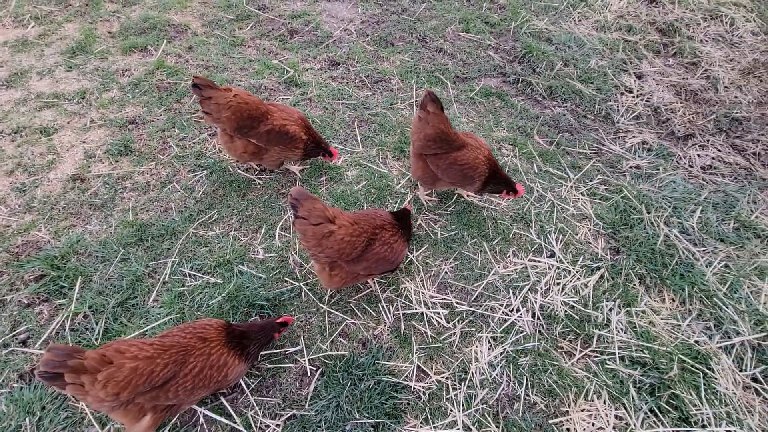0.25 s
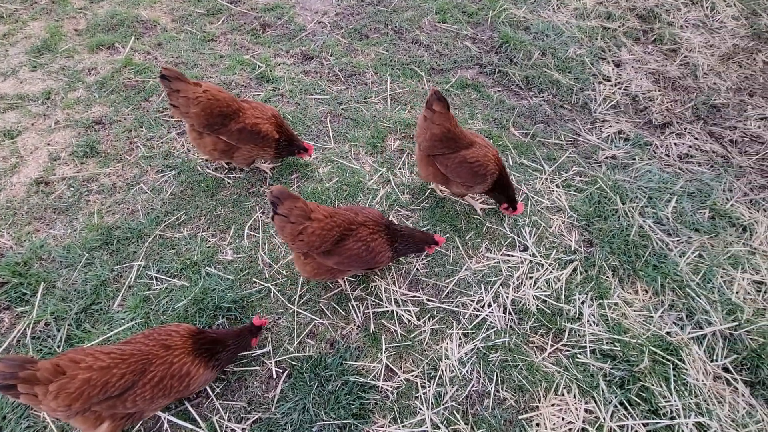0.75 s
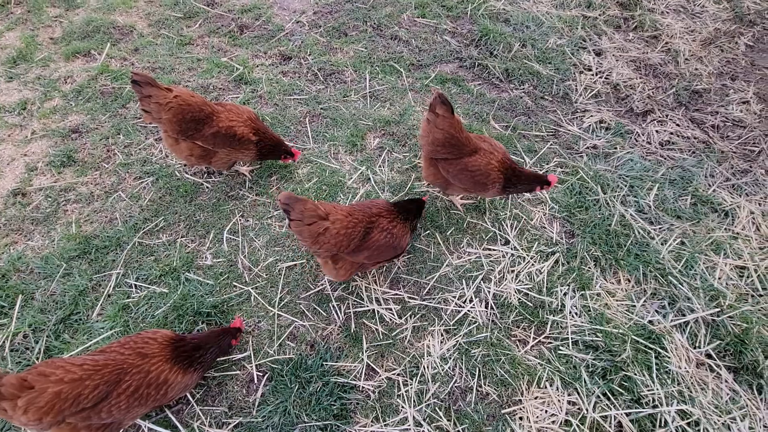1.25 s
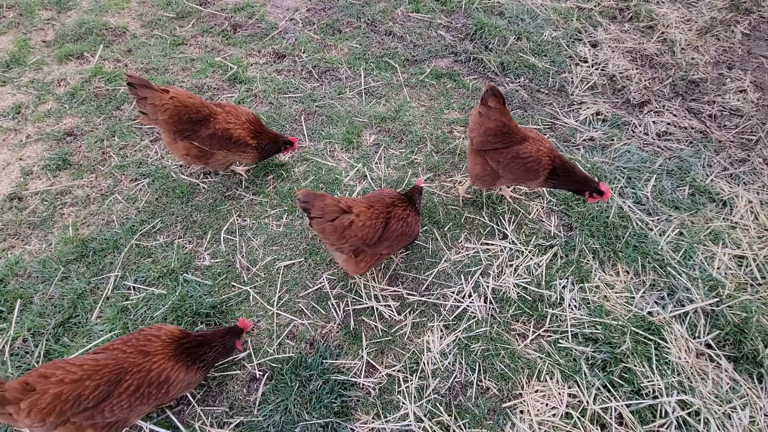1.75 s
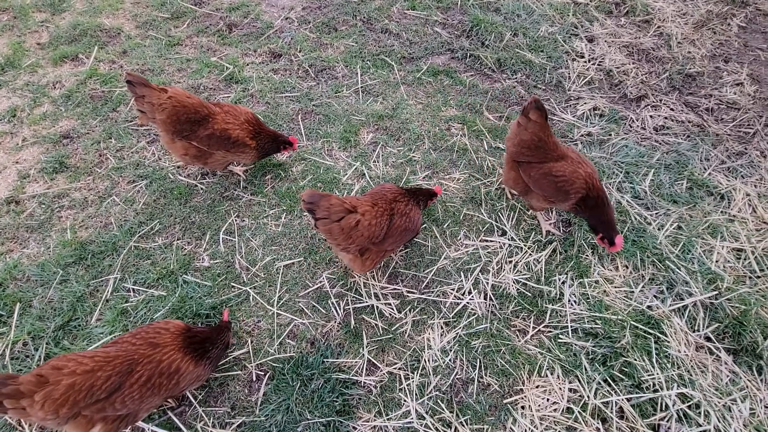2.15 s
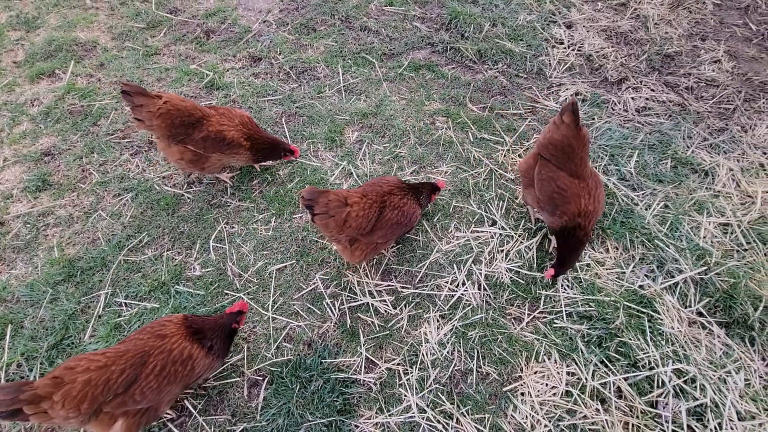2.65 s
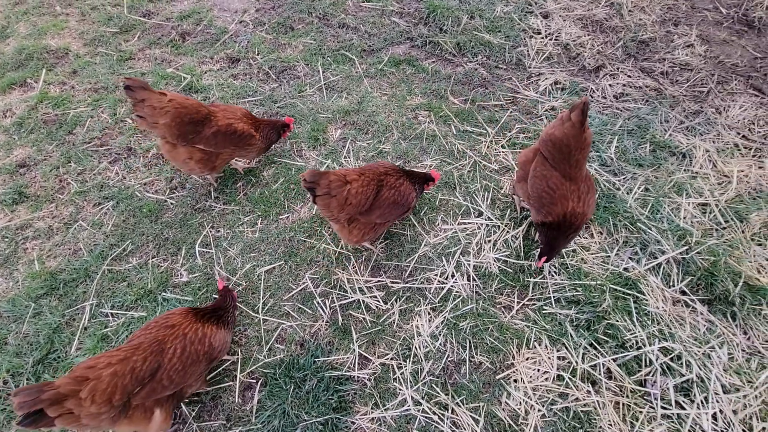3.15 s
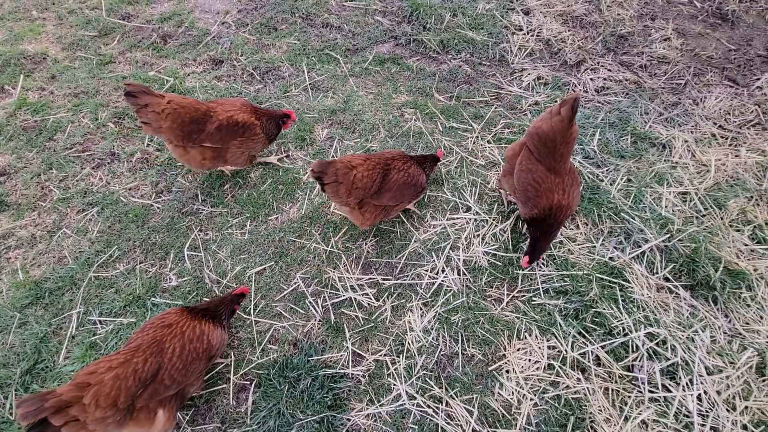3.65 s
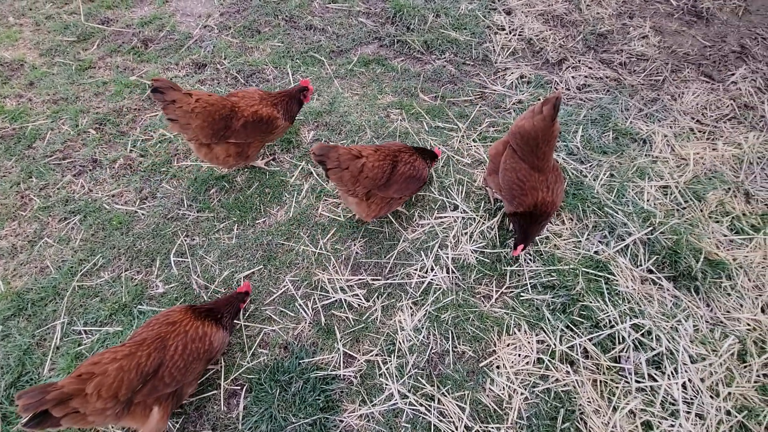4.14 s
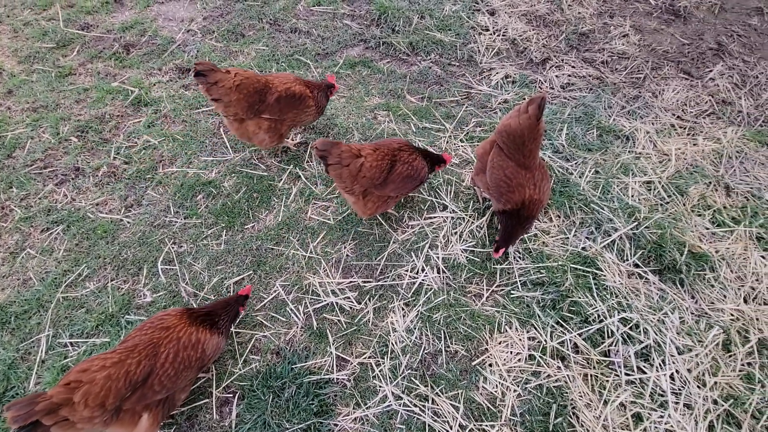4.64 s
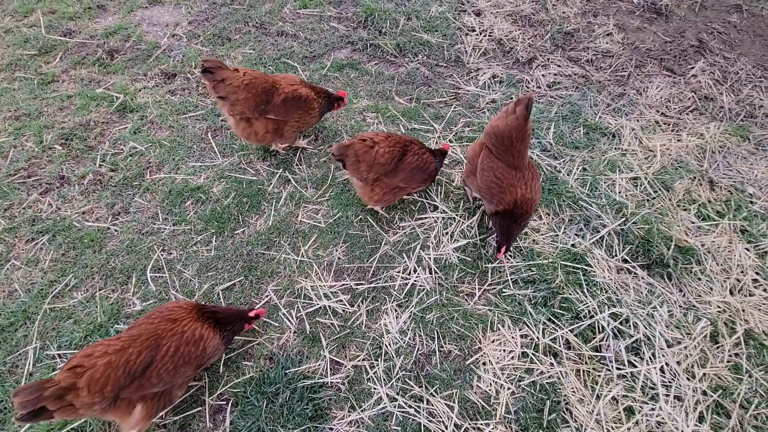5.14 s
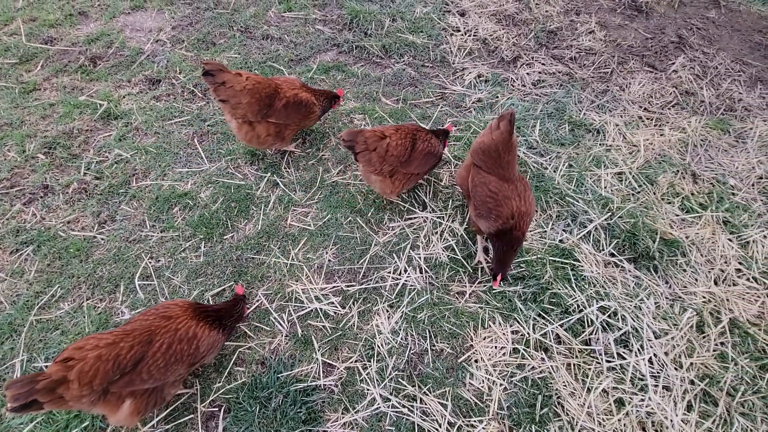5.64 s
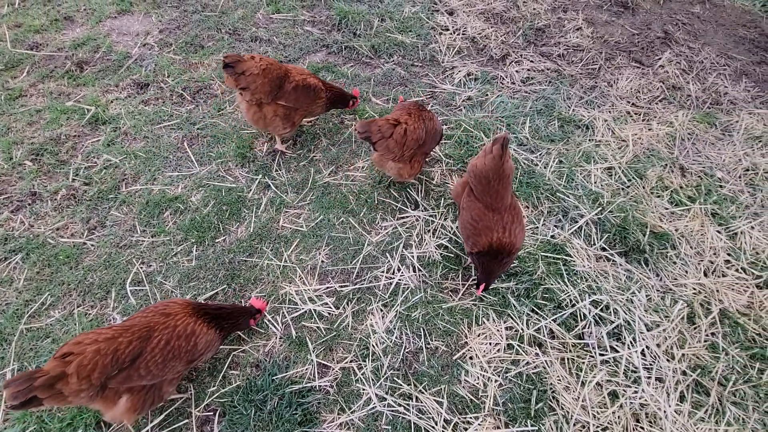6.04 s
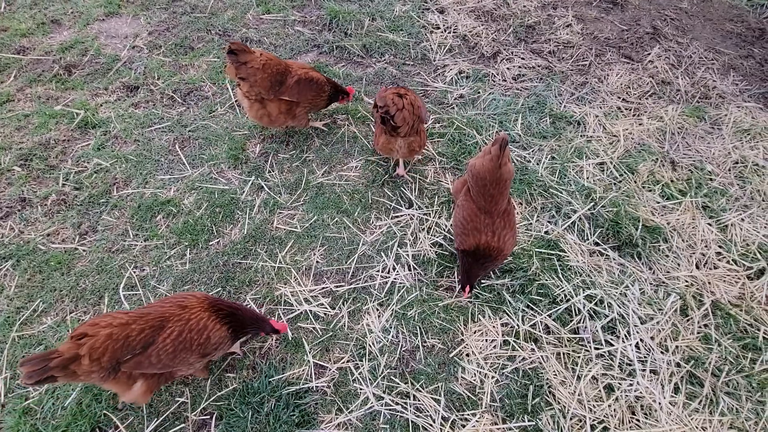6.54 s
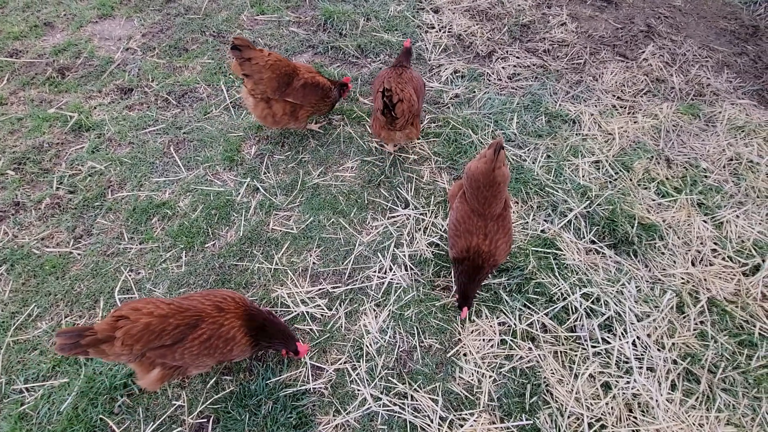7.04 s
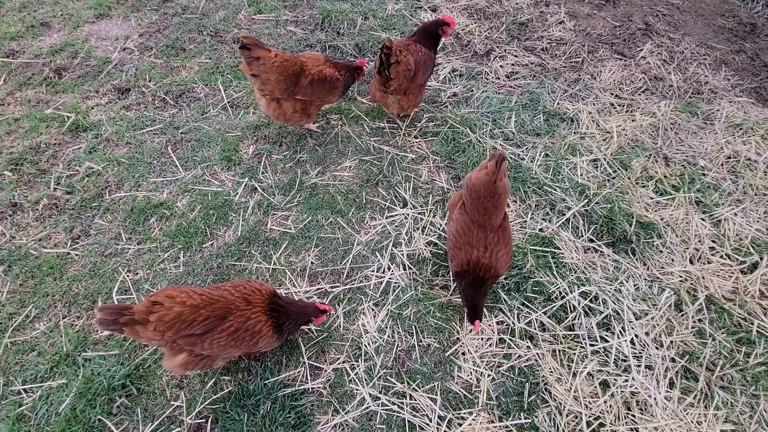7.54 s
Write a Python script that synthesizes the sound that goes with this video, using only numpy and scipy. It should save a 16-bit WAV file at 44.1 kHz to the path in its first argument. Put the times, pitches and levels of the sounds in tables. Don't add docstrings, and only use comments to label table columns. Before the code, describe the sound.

A quiet outdoor yard heard through a small close stereo microphone. From 0 to 1.2 seconds hens stir dry straw busily: crisp bright stalk snaps on both sides, light beak taps and short foot rustles, with tiny soft murmurs near 0.3 and 0.8. The activity thins, and at about 1.9 to 2.2 seconds come two short throaty clucks, the first dipping then rising, the second higher and pushed. Sharper pecks land around 2.4 and 2.7. Scattered snaps and flicks continue, with faint low murmurs near 3.6 and 4.3. Straw rustles again around 5.6 to 5.8, a cluster of crackles comes at 6.7 to 6.8, and a crisp peck and snap at 7.3. Breeze hiss in the grass fades after 3 seconds. A far idling engine hums steadily over low rumble, its drone swelling from 5 to 6.3 seconds, then easing until the end near 7.8.

```python
import sys
import numpy as np
from scipy import signal
from scipy.fft import rfft, irfft, next_fast_len
from scipy.io import wavfile
from scipy.ndimage import uniform_filter1d, map_coordinates

SR = 44100
rng = np.random.default_rng(int(sys.argv[2]) if len(sys.argv) > 2 else 0)


def wav_out(sig):
    wavfile.write(sys.argv[1], SR, np.round(np.clip(np.atleast_2d(sig).T, -1, 1) * 32767).astype(np.int16))


def voltage_ratio(decibels):
    exponent = np.asarray(decibels, float) / 20
    return 10 ** exponent


N = 343715
HISS_HZ, TOP_HZ = 15850, 16600


def unit(x):
    return x / np.sqrt(np.mean(x ** 2) + 1e-20)


def along(points, hz):
    f, v = np.transpose(points)
    return np.interp(np.log(hz + 1), np.log(f + 1), v)


def curves(rows, t):
    s, *cols = np.transpose(rows)
    return [np.interp(t, s, c) for c in cols]


def wobble(rate):
    knots = rng.standard_normal(int(N * rate / SR) + 4)
    return map_coordinates(knots, [np.arange(N) * rate / SR])


def filtered(x, response):
    m = next_fast_len(x.shape[-1] + 8192)
    return irfft(rfft(x, m) * response(np.fft.rfftfreq(m, 1 / SR)), m)[..., :x.shape[-1]]


def tinted(x, points):
    def response(hz):
        gain = voltage_ratio(along(points, hz))
        return gain / np.sqrt(np.mean(gain ** 2))
    return filtered(x, response)


def sides(balance_db, lead):
    ratio = voltage_ratio(balance_db) * np.exp(1j * lead)
    return np.array([2 * ratio, 2 + 0 * ratio]) / (1 + ratio)


def add(track, s, sound):
    part = track[:, round(s * SR):][:, :sound.shape[1]]
    part += sound[:, :part.shape[1]]


# f/Hz, width/Hz, level/dB
THROAT_RINGS = [(779, 85, 10), (1120, 105, 4.5), (1366, 87, -11.5), (1770, 240, -19), (3750, 150, -25.5),
                (4300, 400, -36)]
CLOSED_SHIFT, OPENING_S = 0.93, 0.016


def throat(f, shape):
    total = 0
    for k, (c, width, db) in enumerate(shape):
        push = (-1) ** k * voltage_ratio(db) * 1j * f * width * c * c
        total = total + push / (c * c - f * f + 1j * f * width) / (c * c + f * f)
    return total


def voice_box(f):
    closed = [(c * (CLOSED_SHIFT if k == 1 else 1), w, db) for k, (c, w, db) in enumerate(THROAT_RINGS)]
    steep = (f / 620) ** 2 / (1 + (f / 620) ** 4) ** .5
    return np.array([throat(f, closed), throat(f, THROAT_RINGS)]) * steep


def air_sac(f):
    return 1 / np.sqrt(1 + ((f - 300) / 60) ** 2)


# t/s, pulse rate f/Hz, effort level/dB
CLUCK_PATHS = [
    [(1.9205, 193.5, -47), (1.9245, 192, -37.5), (1.94, 175.8, -38.5), (1.955, 188, -39),
     (1.967, 225.4, -41), (1.983, 261, -43), (1.995, 271, -57), (2.006, 264, -66)],
    [(2.102, 248, -58), (2.105, 244, -44), (2.115, 247, -46), (2.12, 293, -42.5), (2.126, 293, -38.5),
     (2.135, 282, -36), (2.152, 285.5, -48), (2.161, 288, -68), (2.178, 285, -66)],
]
# f/Hz, level/dB
HEN_SIDE_LEVEL = [(150, -1), (300, -3.5), (600, -6), (1000, -4), (1500, -3), (2500, -16)]
# f/Hz, phase/rad
HEN_SIDE_PHASE = [(150, 0), (300, -.3), (500, -1.4), (800, -1.8), (1200, -2.4), (1800, -2.7)]
TIGHT_HZ, SLACK_PER_HZ = 270, 0.0033
ONSET_ROUGH, SETTLE_S = .45, .013
CHEST_DB, CHEST_LATE_DB, CHEST_RISE_S, CHEST_HOLDS = -5, 9, 0.047, 0.34


def clucks():
    pulses, chest, shut = np.zeros((3, N))
    for rows in CLUCK_PATHS:
        at = np.arange(round(rows[0][0] * SR), round(rows[-1][0] * SR))
        hz, effort_db = curves(rows, at / SR)
        age = (at - at[0]) / SR
        slack = SLACK_PER_HZ * np.clip(TIGHT_HZ - hz, 0, None)
        rough = np.maximum(slack, ONSET_ROUGH * np.exp(-(age / SETTLE_S) ** 2)) + .03
        shut[at - 40] = np.exp(-age / OPENING_S)
        cycles = np.cumsum(hz) / SR + .2
        beats = np.flatnonzero(np.diff(np.floor(cycles)))
        chance = rng.standard_normal((40, 2))[:len(beats)] * rough[beats, None]
        late = (chance[:, 0] * 55).astype(int)
        pulses[at[beats] + late] = -voltage_ratio(effort_db[beats] + 36 + 3 * chance[:, 1])
        breath = rough * rng.standard_normal(len(at)) * np.exp(-3 * (cycles % 1))
        pulses[at] += voltage_ratio(effort_db + 22) * breath
        chest_db = CHEST_DB - CHEST_LATE_DB * np.exp(-age / CHEST_RISE_S)
        chest_db = chest_db + CHEST_HOLDS * (effort_db.max() - effort_db)
        low = air_sac(hz) * np.sin(2 * np.pi * cycles + 5.9)
        low = low + 0.5 * air_sac(2 * hz) * np.sin(4 * np.pi * cycles + 0.65)
        chest[at] = voltage_ratio(effort_db + chest_db + 5.0) * low
    voice = -filtered(pulses * [shut, 1 - shut], voice_box).sum(0) - chest
    voice = voice + voltage_ratio(-15) * np.roll(voice, 420) + voltage_ratio(-22) * np.roll(voice, 900)
    return filtered(voice, lambda hz: sides(along(HEN_SIDE_LEVEL, hz), along(HEN_SIDE_PHASE, hz)))


# t/s, peak level/dB, f/Hz, length/s
MURMUR_NOTES = [
    (0.321, -56, 378, 0.01),
    (0.779, -56.5, 365, 0.029),
    (3.55, -59, 275, 0.016),
    (3.585, -56.5, 292, 0.017),
    (4.314, -50, 338, 0.008),
]


def murmurs():
    out = np.zeros((2, N))
    for s, db, hz, length in MURMUR_NOTES:
        u = np.arange(round(2 * length * SR)) / SR / length
        note = u * np.exp(1 - 3 * u) * 3 * np.exp(2j * np.pi * hz * length * u)
        add(out, s, voltage_ratio(db) * (sides(-1, -0.38)[:, None] * note).imag)
    return out


# t/s, peak level/dB, soil f/Hz
PECKS_ON_SOIL = [(0.805, -62, 1450), (0.869, -58, 736), (1.094, -59, 654), (1.534, -59, 1220),
                 (4.03, -59.5, 1200), (4.836, -66, 1460), (5.092, -58, 1310), (5.104, -66, 1910),
                 (5.391, -67, 1510), (5.73, -70, 1350), (5.775, -62, 620), (6.155, -70, 796),
                 (6.778, -67, 1320), (6.401, -66, 1270), (6.503, -68, 660), (7.288, -58.5, 1270),
                 (7.595, -66, 1440), (7.618, -67, 1240)]
# t/s, peak level/dB, soil f/Hz, stalk f/Hz
PECKS_ON_STALKS = [(0.227, -66, 1210, 1690), (0.295, -62, 770, 3660), (0.31, -59, 1120, 3630),
                   (0.566, -60, 856, 2970), (0.607, -64.5, 1100, 3060), (0.756, -69, 673, 2200),
                   (0.7803, -61, 1460, 2070), (1.072, -62, 690, 1140), (1.329, -62, 1230, 1870),
                   (1.346, -62, 1300, 1770), (1.657, -66, 1420, 1620), (2.378, -51.5, 1170, 2870),
                   (2.716, -54.5, 1290, 1810), (3.012, -66, 1120, 2100), (3.095, -66, 710, 4700),
                   (3.6117, -57.5, 750, 3520), (3.688, -71, 1260, 3750), (4.021, -69, 1270, 2020),
                   (4.156, -71, 1120, 3580), (4.215, -68, 1410, 3970), (4.313, -66.5, 915, 2920),
                   (4.497, -64.5, 1420, 2100), (5.504, -70, 695, 4700), (6.288, -66, 1010, 3220),
                   (6.744, -64, 1620, 1720), (7.162, -70, 1290, 1960), (7.275, -51.5, 1290, 5960),
                   (7.336, -65, 805, 1580)]
STALK_DB, LITTER_DB, LITTER_HZ = 4, -9.5, 2100


def pecks():
    out, t = np.zeros((2, N)), np.arange(600) / SR

    def ring(hz):
        fade = voltage_ratio(-60 * t / (.006 + 6 / hz))
        return fade * np.exp(2j * np.pi * hz * t) * (1 - np.exp(-(t / .0007) ** 2))

    knocks = [(*row, STALK_DB) for row in PECKS_ON_STALKS]
    for s, db, hz in PECKS_ON_SOIL:
        knocks.append((s, db, hz, LITTER_HZ * np.exp(0.071 * rng.standard_normal()), LITTER_DB))
    for s, db, soil_hz, stalk_hz, stalk_db in knocks:
        place = sides(rng.normal(-1.4, 0.91), rng.choice([-1, 1]) * 1.4)[:, None]
        rings = (place * (ring(soil_hz) + voltage_ratio(stalk_db) * ring(stalk_hz))).imag
        grit = uniform_filter1d(rng.standard_normal((2, len(t))), size=4)
        tick = 0.29 * t / 0.00074 * voltage_ratio(-60 * t / 0.011) * grit
        add(out, s, voltage_ratio(db + 13.0) * (rings + voltage_ratio(stalk_db) * tick))
    return out


# t/s, thin crack level/dB, broad crack level/dB
CRACKS_RIGHT = [(0.1469, -42, -67), (0.1498, -48, -71), (0.2275, -41, -61), (0.3224, -35, -56),
                (0.3321, -43, -38), (0.4506, -41.5, -61), (0.4557, -42.0, -66), (0.5723, -32.5, -45),
                (0.5778, -36, -70.0), (0.8012, -51, -66), (0.8093, -47, -56), (0.856, -49, -63),
                (0.9221, -41, -63.0), (0.9474, -44, -65), (0.9824, -47, -74), (1.0079, -44, -65),
                (1.0248, -40.5, -65), (1.0429, -49, -67.0), (1.1005, -55, -67), (1.1067, -34.5, -64),
                (1.1587, -41, -61), (1.3318, -52, -44), (1.3396, -58, -47), (1.51, -50, -64),
                (1.9478, -53, -64), (2.0096, -44, -55), (2.0172, -46, -50), (2.0473, -43, -54),
                (2.0659, -45.0, -46), (2.4385, -62, -58), (2.7165, -56, -49), (2.7634, -44.0, -63),
                (3.0081, -52, -52), (3.0138, -39, -41), (3.0311, -54, -45.5), (3.437, -57, -69.0),
                (3.7954, -52, -50.5), (3.9185, -48.5, -56), (4.1597, -46, -41), (4.1923, -49, -63),
                (4.218, -47, -47), (4.3142, -65, -61), (4.8372, -52, -52.5), (4.938, -47, -58),
                (5.2937, -59, -77), (5.6067, -53, -56), (5.688, -52, -56), (5.8051, -36.5, -46),
                (6.1834, -36, -62), (6.3983, -48, -65.0), (6.9143, -54.0, -70.0), (6.9592, -66, -53.5),
                (7.1917, -46, -69.0), (7.2331, -48, -65), (7.2392, -47, -64.0), (7.5949, -42, -47)]
CRACKS_LEFTISH = [(0.0243, -38.5, -65), (0.2636, -50, -44.0), (0.2955, -46, -36.5), (0.3075, -38.0, -32),
                  (0.3486, -53.0, -54), (0.4056, -47, -49), (0.4898, -48, -55), (0.7498, -44, -43.5),
                  (0.8427, -45.0, -59.0), (0.8473, -43, -51), (0.8513, -54, -61), (1.095, -40.0, -62),
                  (1.3552, -39, -56), (1.3762, -39, -57.0), (1.381, -41, -59), (1.4258, -35.5, -51),
                  (1.4654, -47, -68.0), (1.658, -48, -51), (1.8584, -38, -44), (1.9322, -55, -53),
                  (2.4193, -42, -53), (2.803, -56, -57), (3.011, -42, -50), (3.1044, -36, -42),
                  (3.5632, -57.0, -50.5), (3.6124, -61, -43), (3.6875, -37.5, -45.5), (4.0305, -36.5, -41),
                  (4.348, -45, -67), (4.3574, -41, -45), (4.4983, -50, -45.5), (4.6094, -39.5, -72),
                  (5.0052, -51, -74.0), (5.0658, -53, -56), (5.0917, -41, -44.5), (5.1355, -57, -61.0),
                  (5.2289, -42.5, -55), (5.2397, -50, -65), (5.5329, -45, -64), (5.8118, -51, -56),
                  (5.9132, -47, -53), (6.1761, -46, -54), (6.289, -54.0, -67), (6.4022, -46.5, -44.5),
                  (6.4834, -54, -70), (6.5026, -52, -47), (6.7034, -42, -52), (6.7786, -52, -44),
                  (6.8132, -44.0, -47), (6.8323, -35, -43), (7.1637, -36, -51), (7.2729, -42, -47),
                  (7.2758, -30.5, -40), (7.337, -47, -43), (7.5453, -48, -50), (7.7384, -61, -64)]
CRACKS_MIDDLE = [(0.312, -36, -40), (0.5623, -34, -49), (0.566, -40, -45), (0.6071, -32, -50),
                 (0.6113, -29.5, -38), (0.7565, -45, -40), (1.2936, -55.0, -49), (1.3685, -41.0, -56),
                 (1.7765, -49, -52), (1.78, -53, -56), (1.7875, -46, -59), (1.7945, -45, -45),
                 (1.7993, -56, -56), (1.8095, -50, -45), (1.8622, -44.0, -45), (2.1251, -50, -50),
                 (2.3659, -37.5, -64), (2.378, -45, -51), (2.753, -36, -43.5), (3.097, -38, -58),
                 (3.3361, -54, -58), (3.3915, -51, -46), (3.4218, -42, -40.5), (3.4283, -37.0, -45),
                 (3.4333, -48, -51.0), (4.0232, -35.5, -49), (4.3336, -45, -72), (4.368, -37, -43.5),
                 (4.5886, -45, -66), (4.5946, -42, -63), (4.5988, -46.0, -64), (4.8748, -41, -60),
                 (4.9498, -52.0, -60), (5.0485, -49.0, -63), (5.0558, -57, -44.5), (5.0731, -38.5, -59),
                 (5.1935, -51, -68.0), (5.5049, -47, -53), (5.6817, -45.0, -47), (5.7041, -41, -57.0),
                 (5.7224, -44, -52), (6.1861, -52, -65), (6.2072, -48, -52), (6.226, -49, -49.5),
                 (6.2786, -53, -57.0), (6.2828, -51, -53), (6.6522, -39, -49), (6.6581, -41, -51),
                 (6.7346, -35, -41), (6.7377, -38, -42.5), (6.7858, -47, -48), (6.8197, -47, -41),
                 (6.8372, -49, -54), (7.1605, -39.5, -57), (7.1701, -54.0, -43), (7.1765, -51.0, -55.0)]
CRACKS_FURTHER = [(0.3688, -48, -66), (0.9176, -51, -60), (1.5748, -49, -63), (1.8362, -45, -62),
                  (2.1333, -55, -44), (3.3264, -51, -50.5), (5.6744, -51, -50), (5.9944, -49, -52),
                  (6.7163, -49, -53), (6.7445, -44, -46), (7.2893, -50, -53)]
# f/Hz, level/dB per Hz
THIN_STRAW = [(5000, -19), (8000, -10.5), (10500, -6.5), (12300, 6), (14000, 4.5), (16000, -3)]
# f/Hz, level/dB per Hz
THICK_CRACK = [(900, -12), (1600, -8), (3000, -7), (4500, -3.5), (6500, -7.5), (8500, -1), (10000, -10.5),
               (13000, -23)]
RIGHT_DB, LEFTISH_DB, MIDDLE_DB = -4.5, 2, 1
CRACK_S, SKIRT_S, SKIRT_DB = 0.00054, 0.027, -13
SHARED = 0.75


def snaps():
    fine, coarse, t = np.zeros((2, N)), np.zeros((2, N)), np.arange(-300, 500) / SR
    burst = np.exp(-(t / CRACK_S) ** 2) + voltage_ratio(SKIRT_DB - 60 * abs(t) / SKIRT_S)
    places = ((CRACKS_RIGHT, RIGHT_DB), (CRACKS_LEFTISH, LEFTISH_DB), (CRACKS_MIDDLE, MIDDLE_DB),
              (CRACKS_FURTHER, LEFTISH_DB))
    for rows, lr_db in places:
        pan = voltage_ratio([[lr_db / 2], [-lr_db / 2]])
        for s, thin_db, broad_db in rows:
            noise = rng.standard_normal((2, 3, len(t)))
            noise = noise[:, :2] + SHARED * noise[:, 2:] * [[[1], [1]], [[1], [-1]]]
            noise = noise * burst
            noise = noise / np.linalg.norm(noise, axis=2, keepdims=True) * np.linalg.norm(burst) * pan
            add(fine, s + t[0], voltage_ratio(thin_db - 4.0) * noise[0])
            add(coarse, s + t[0], voltage_ratio(broad_db - 7.0) * noise[1])
    return tinted(fine, THIN_STRAW) + tinted(coarse, THICK_CRACK)


# t/s, peak level/dB, f/Hz
TWIG_TICKS = [(0.024, -63, 1100), (0.264, -47, 4000), (0.799, -59, 1700), (1.1067, -39, 6700),
              (2.066, -55, 7740), (3.532, -66.5, 1290), (3.6128, -58, 1210), (3.796, -69, 1900),
              (3.919, -63, 3800), (5.606, -54, 7600), (5.68, -45, 8000), (6.279, -60, 3300),
              (6.298, -63, 3400), (6.503, -55, 3570), (6.762, -61, 3200), (6.833, -52, 3600),
              (6.833, -64, 2000), (7.275, -58, 2900), (7.545, -63, 3900)]
TWIG_CYCLES = 12


def twigs():
    out, t = np.zeros((2, N)), np.arange(400) / SR
    for s, db, hz in TWIG_TICKS:
        fade = voltage_ratio(db + 12 - 60 * t * hz / TWIG_CYCLES)
        ring = fade * np.exp(2j * np.pi * hz * t) * (1 - np.exp(-t / 0.00034))
        place = sides(rng.normal(-1, 2), rng.normal(0, 1))[:, None]
        add(out, s - .0005, (place * ring).imag)
    return out


# t/s, level/dB
STEADY_SHUFFLE = [(0, -62), (.45, -57.5), (1.0, -64), (1.25, -68), (2.3, -66), (3.3, -67), (4, -68),
                  (5.3, -71), (6.1, -68), (6.95, -72.5), (7.4, -68.5), (7.79, -69.5)]
# t/s, length/s, level/dB, coarse straw level/dB
FOOT_DRAGS = [(0.224, 0.12, -50, -12.5), (0.524, 0.11, -56, -29), (0.737, 0.024, -54, -15),
              (0.795, 0.099, -57, -19), (1.341, 0.029, -60, -3), (1.78, 0.039, -67, -11),
              (1.842, 0.036, -51.5, -17), (2.054, 0.011, -54.5, -9), (2.718, 0.077, -60, -7.5),
              (2.907, .17, -64, -14), (3.672, 0.089, -61, -11), (4.132, 0.082, -64.5, -6.5),
              (4.45, 0.12, -69.5, -7), (4.807, 0.11, -66.5, -8.5), (5.055, 0.079, -57.5, -14),
              (5.503, 0.036, -61.5, -7.5), (5.618, 0.078, -51, -12), (5.75, 0.077, -56, -10),
              (5.984, 0.057, -62.5, -13), (6.138, 0.074, -67, -8), (6.658, 0.015, -53.5, -20),
              (6.71, 0.055, -60, -8), (6.772, 0.063, -57, -13), (7.129, 0.06, -62, -9.5),
              (7.224, 0.073, -59, -15), (7.526, 0.18, -58, -13.5)]
# t/s, level/dB
BEAK_FLICKS = [(1.1, -56.5), (1.295, -56.5), (1.58, -59), (1.94, -61), (2.131, -55.5), (2.37, -58),
               (2.516, -60), (3.02, -60), (3.099, -50.5), (3.2, -59.5), (3.51, -61), (3.61, -57),
               (4.031, -55), (4.601, -62), (4.891, -60), (5.229, -60), (5.909, -56), (6.401, -59.5),
               (6.5, -58.5)]
BRUSH_S, RISE_DB_PER_S, FALL_DB_PER_S = 0.0019, 683, 493
BRUSH_COARSE_DB, SHUFFLE_COARSE_DB = -10, -10.5


def stirring():
    t = np.arange(0, N, 32) / SR
    flicks = [(s - BRUSH_S / 2, BRUSH_S, db, BRUSH_COARSE_DB) for s, db in BEAK_FLICKS]
    s, length, db, coarse_db = np.transpose(list(FOOT_DRAGS) + flicks)[..., None]
    before, after = np.maximum(s - t, 0), np.maximum(t - s - length, 0)
    moves = voltage_ratio(db - RISE_DB_PER_S * before - FALL_DB_PER_S * after)
    still = voltage_ratio(curves(STEADY_SHUFFLE, t)[0])
    fine = np.sqrt(still ** 2 + np.sum(moves ** 2, axis=0))
    coarse_moves = np.sum((moves * voltage_ratio(coarse_db)) ** 2, axis=0)
    coarse = np.sqrt((still * voltage_ratio(SHUFFLE_COARSE_DB)) ** 2 + coarse_moves)
    return [np.interp(np.arange(N) / SR, t, level) for level in (fine, coarse)]


def patchy(patchy_db):
    z = signal.stft(rng.standard_normal((2, 3, N)), nperseg=256)[2]
    field = uniform_filter1d(rng.standard_normal(z.shape[2:]), size=9, axis=0)
    field = uniform_filter1d(field, size=10, axis=1)
    noise = signal.istft(z * voltage_ratio(patchy_db * unit(field)), nperseg=256)[1][..., :N]
    return unit(noise[:, :2] + .5 * noise[:, 2:] * [[[0], [0]], [[1], [-1]]])


def clumps():
    happens = rng.random(N) < 350 * voltage_ratio(3 * wobble(30)) / SR
    cracks = happens * voltage_ratio(0.76 * rng.exponential(size=N) - 3.5)
    rough = voltage_ratio(1.3 * wobble(70)) * (.58 + np.convolve(cracks, np.hanning(60), "same"))
    return rough / np.sqrt(abs(uniform_filter1d(rough ** 2, size=3500)))


# f/Hz, level/dB per Hz
THICK_STRAW = [(700, -21), (1500, 0.5), (2500, -7), (3800, 0), (5500, -6.5), (8000, -1), (10000, -2.5),
               (13000, -38)]


def rustle():
    fine_gain, coarse_gain = stirring()
    fine, coarse = patchy(patchy_db=2.1)
    shared = clumps()
    thin = fine_gain * shared * fine
    thick = voltage_ratio(2.0) * coarse_gain * shared ** 0.43 * clumps() ** 0.83 * coarse
    return tinted(thin, THIN_STRAW) + tinted(thick, THICK_STRAW)


# t/s, level/dB
BREEZE_LEVEL = [
    (0.0, -66.5),
    (0.48, -64),
    (2.91, -75.5),
    (5.8, -79),
    (6.51, -83.5),
    (7.79, -80),
]
# f/Hz, level/dB per Hz
GRASS_HISS = [(400, 1.5), (800, 0.5), (2000, 0.5), (3000, -10), (6000, -25.5), (10000, -19), (13000, -2),
              (16000, 3.5)]


def breeze():
    level_db, = curves(BREEZE_LEVEL, np.arange(N) / SR)
    gusts_db = .8 * wobble(3.3) + 1.3 * wobble(30)
    return voltage_ratio(level_db + 5.5 + gusts_db) * tinted(rng.standard_normal((2, N)), GRASS_HISS)


# t/s, firing tone level/dB, exhaust overtones level/dB
ENGINE_SWELL = [(0.0, -51, -86), (0.28, -51, -74), (0.93, -55.5, -73.5), (2.0, -55, -71.5),
                (2.43, -55.5, -81), (3.2, -54.5, -80), (3.5, -51, -84), (3.9, -53.5, -81), (4.25, -51, -69),
                (4.79, -49.5, -68), (5.32, -47, -58.5), (5.7, -44.5, -60.5), (6.2, -46, -57),
                (6.55, -48.5, -67.5), (6.94, -47, -76.5), (7.05, -47, -67.5), (7.79, -49, -66)]
# shaft order, level/dB, left over right level/dB, left lead phase/rad
EXHAUST_TONES = [(12, -25, -4, -.5), (14, -24, -5, -1.5), (15, -23, -6, -2), (16, 0, -10, -2.2),
                 (17, -22, -9, -2.1), (18, -18, -5, -2.6), (20, -22, -8, -2.8), (22, -25, -8, -2.6),
                 (24, -17, -8, -2.4), (28, -23, -5, -2.8)]
SHAFT_HZ, PUFF_DB = 24.24, -17


def engine():
    firing_db, exhaust_db = curves(ENGINE_SWELL, np.arange(N) / SR)
    turn = 2 * np.pi * SHAFT_HZ * np.arange(N) / SR + .04 * wobble(1.5)
    tone = voltage_ratio(firing_db + .6 * wobble(6)) * sides(-1.1, .05)[:, None] * np.exp(4j * turn)
    for order, db, lr_db, lead in EXHAUST_TONES:
        flutter_db = (.8 if db == 0 else 2.6) * wobble(3)
        swell_db = exhaust_db if order < 17.5 else .38 * exhaust_db - 39
        wave = np.exp(1j * (order * turn + .2 * wobble(5)))
        tone = tone + voltage_ratio(db + flutter_db + swell_db) * sides(lr_db, lead)[:, None] * wave
    puff = (wobble(90) + 1j * wobble(90)) * np.exp(16j * turn)
    tone = tone + voltage_ratio(exhaust_db + PUFF_DB) * sides(-7.0, -3.5)[:, None] * puff
    return np.sqrt(2) * tone.real


# f/Hz, level/dB per Hz
FAR_RUMBLE = [(17, -24.5), (50, -1.5), (75, 0.5), (125, -10.5), (220, -21), (600, -28.5), (950, -40),
              (16000, -55)]
# f/Hz, side over mid level/dB
RUMBLE_WIDTH = [(30, -1.5), (60, -7), (110, -12.5), (200, -8.5), (380, 0.5), (700, 3.5), (3000, 4),
                (15000, -23)]


def distance():
    swell_db = 0.085 * (curves(ENGINE_SWELL, np.arange(N) / SR)[1] + 75)

    def shape(hz):
        return voltage_ratio(along(FAR_RUMBLE, hz)) * np.array([1 + 0 * hz, voltage_ratio(along(RUMBLE_WIDTH, hz))])

    mid, side = filtered(rng.standard_normal((2, N)), shape)
    level = voltage_ratio(-58.5 + swell_db + 0.63 * wobble(2.81))
    return level * np.array([mid + side, mid - side]) / np.std(mid)


def scene():
    steady = filtered(rustle() + breeze() + distance(), lambda hz: hz < HISS_HZ)
    return clucks() + murmurs() + pecks() + snaps() + twigs() + steady + engine()


def in_blocks(hz, t, tall, wide):
    cells = rng.random((len(hz) // tall + 1, len(t) // wide + 1))
    return np.repeat(np.repeat(cells, tall, 0), wide, 1)[:len(hz), :len(t)]


# from t/s, to t/s
DROPOUTS = [(.566, .628), (.98, 1.022), (1.07, 1.122), (1.428, 1.445), (2.348, 2.364), (2.76, 2.785),
            (4.028, 4.042), (4.345, 4.365), (4.84, 4.862), (5.787, 5.803), (6.183, 6.2), (6.838, 6.852)]


def starve(x):
    hz, t, z = signal.stft(x, SR, nperseg=256)
    when = np.any([(t > a) & (t < b) for a, b in DROPOUTS], axis=0)
    where = ((hz > 2400) & (hz < 10500))[:, None]
    quiet = uniform_filter1d(abs(z).mean(0), size=8, axis=0) < voltage_ratio(-83.5)
    blocks = quiet & when & (in_blocks(hz, t, 8, 2) < .6)
    busy = uniform_filter1d(abs(z[:, hz > 11000]).mean((0, 1)), size=40)
    slits = (in_blocks(hz, t, 2, 9) < .03 * busy / busy.mean()) & (hz < 6800)[:, None]
    return signal.istft(z * ~(where & (blocks | slits)), SR, nperseg=256)[1][:, :N]


def top_cut(x):
    return signal.sosfilt(signal.butter(12, 16820, fs=SR, output="sos"), x)


# f/Hz, left over right level/dB
PORT_COLOUR = [(1800, -0.5), (2700, 1.5), (4300, -2.5), (6300, 1), (9500, 3), (11000, 6), (12500, -6),
               (16000, -1.5)]


def record(dry):
    def ports(hz):
        edge = np.where(hz < HISS_HZ, 1, voltage_ratio(-20)) * (hz < TOP_HZ)
        return voltage_ratio(np.array([[.5], [-.5]]) * along(PORT_COLOUR, hz)) * edge

    mix = starve(filtered(dry, ports))
    return top_cut(mix)


dry = scene()
out = record(dry)
wav_out(out)
```